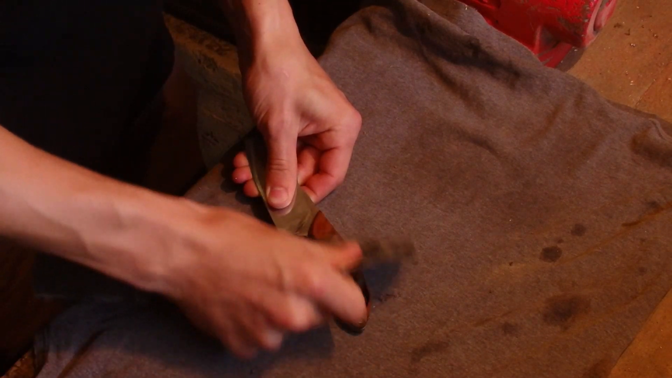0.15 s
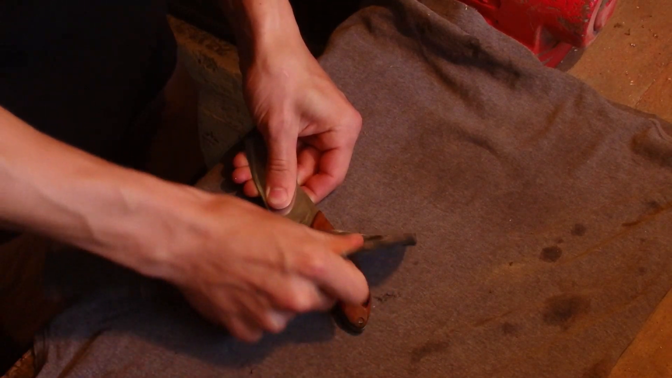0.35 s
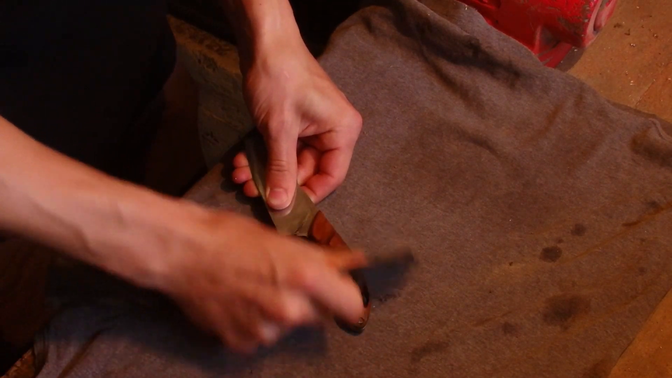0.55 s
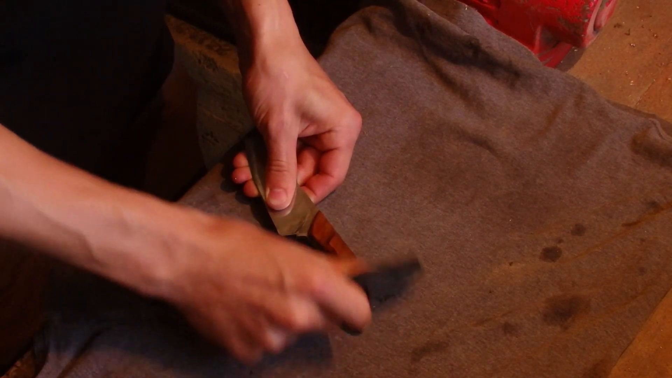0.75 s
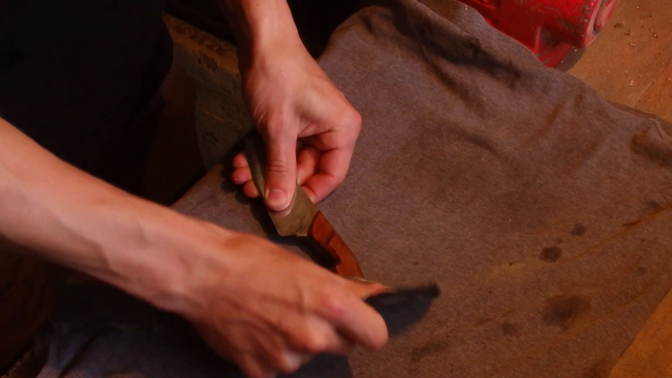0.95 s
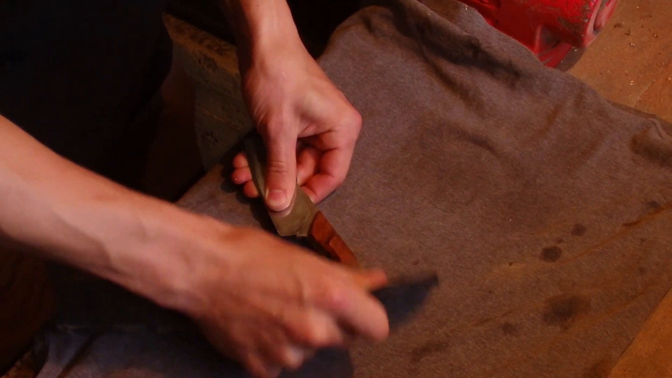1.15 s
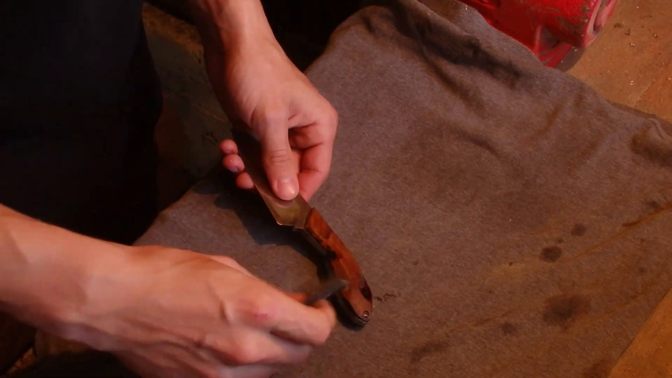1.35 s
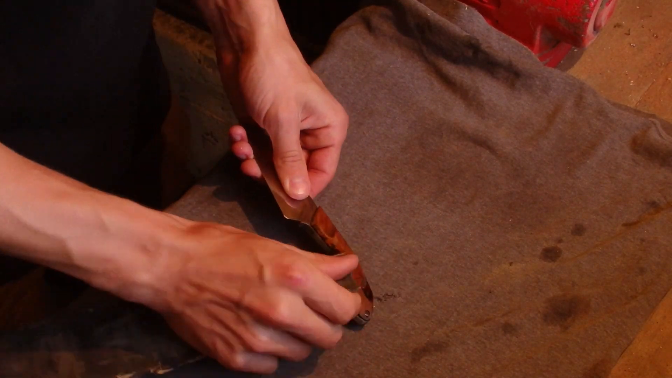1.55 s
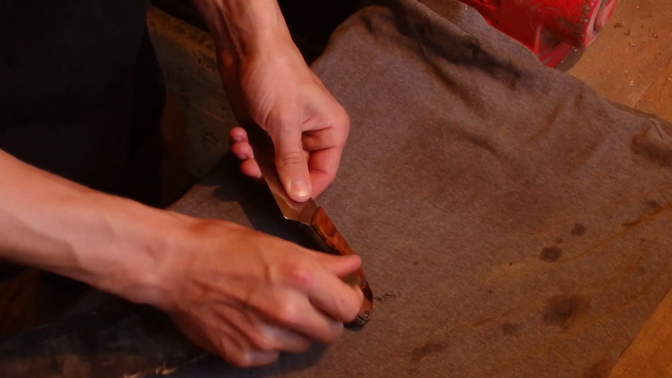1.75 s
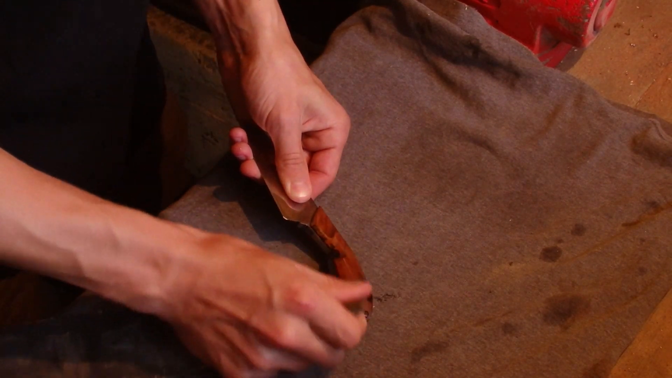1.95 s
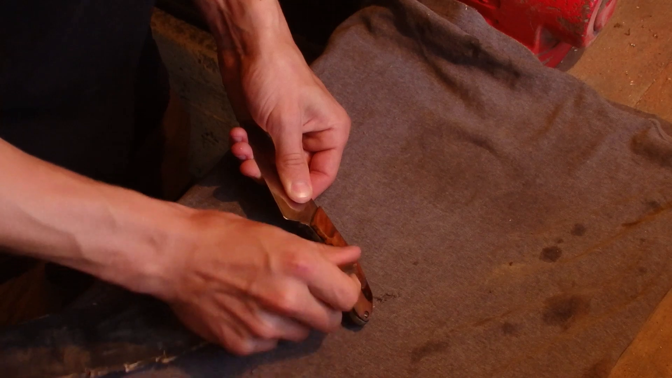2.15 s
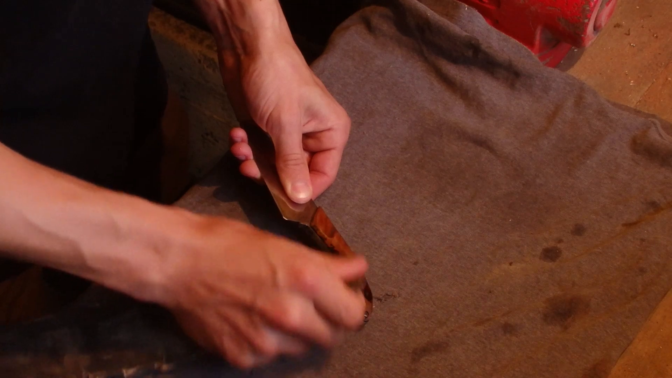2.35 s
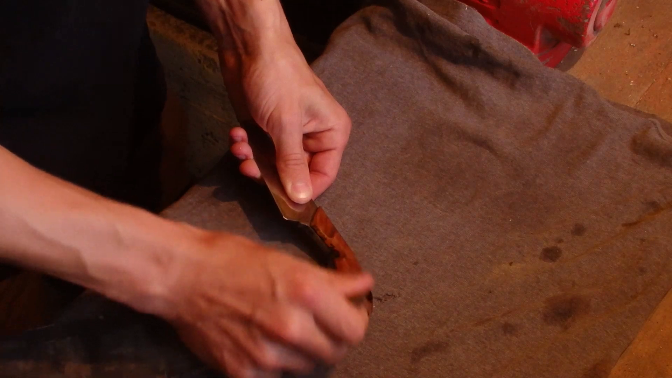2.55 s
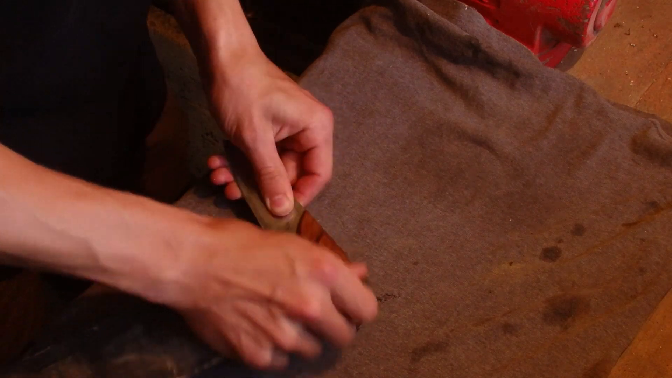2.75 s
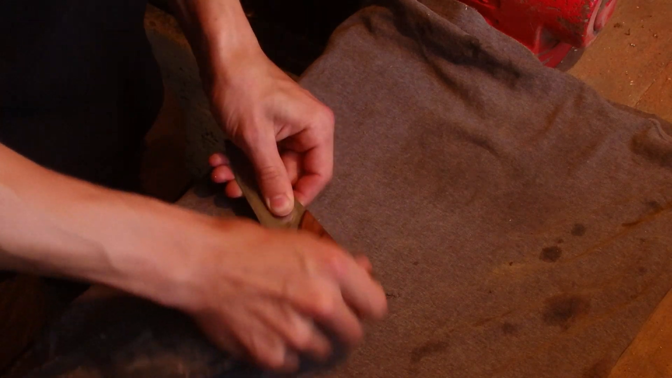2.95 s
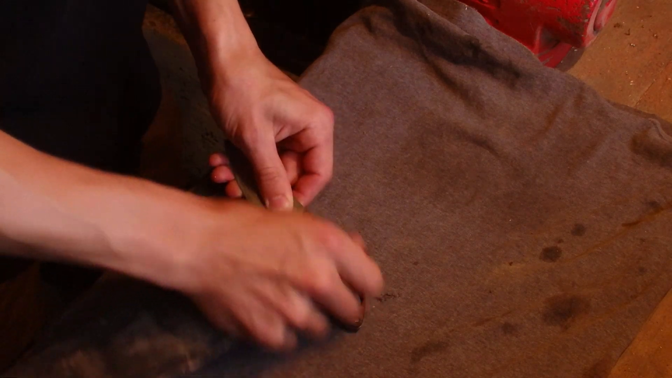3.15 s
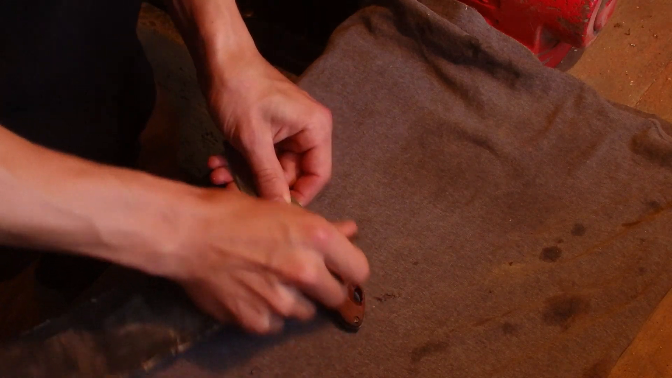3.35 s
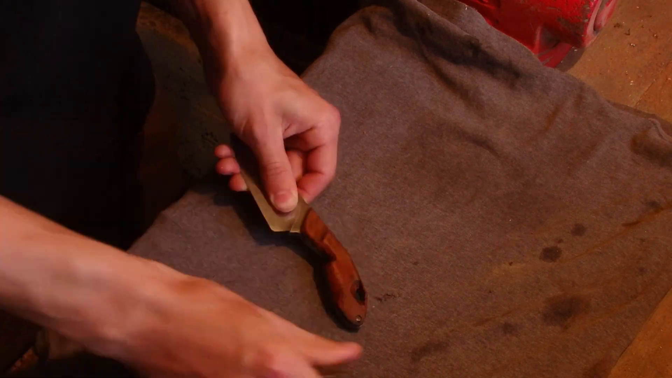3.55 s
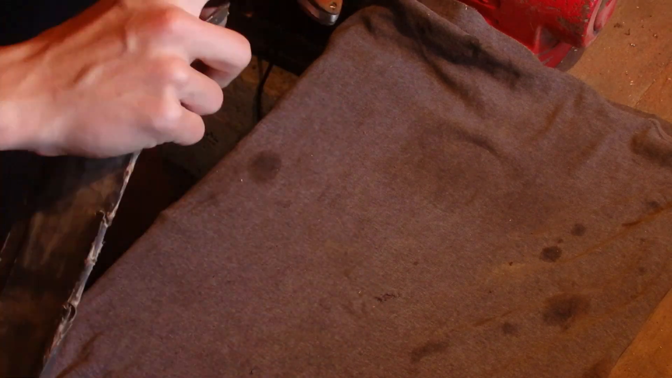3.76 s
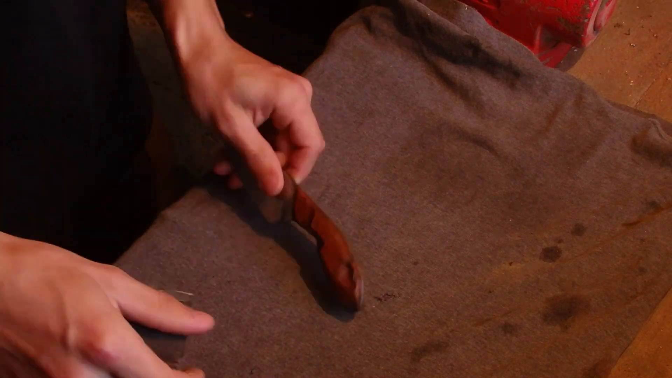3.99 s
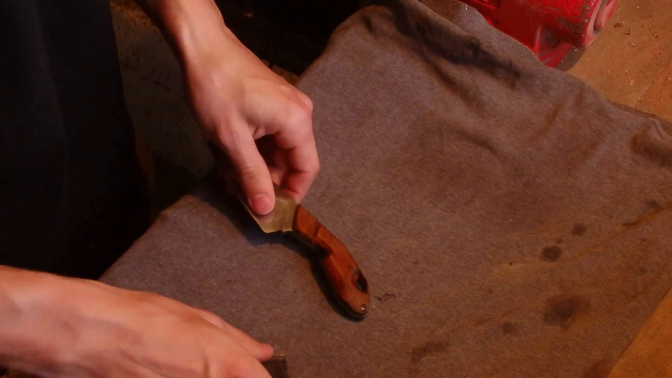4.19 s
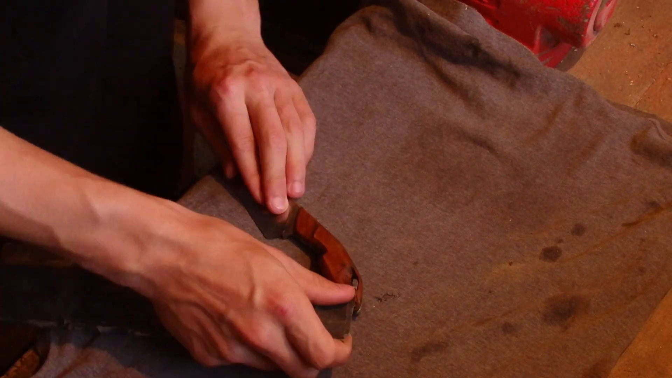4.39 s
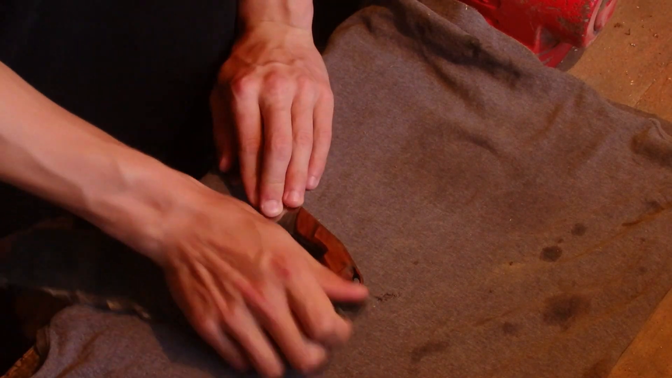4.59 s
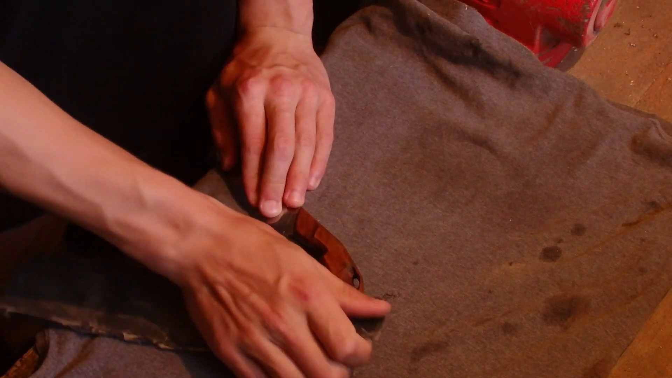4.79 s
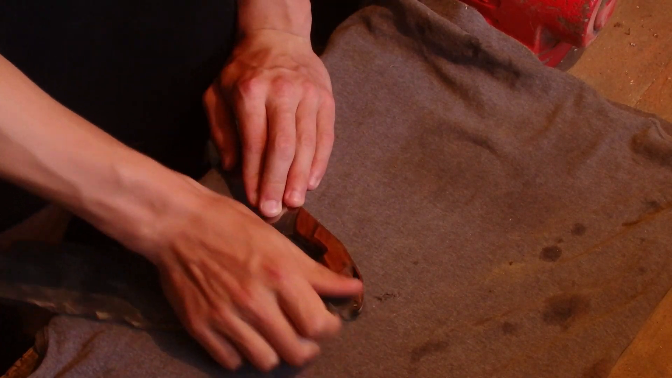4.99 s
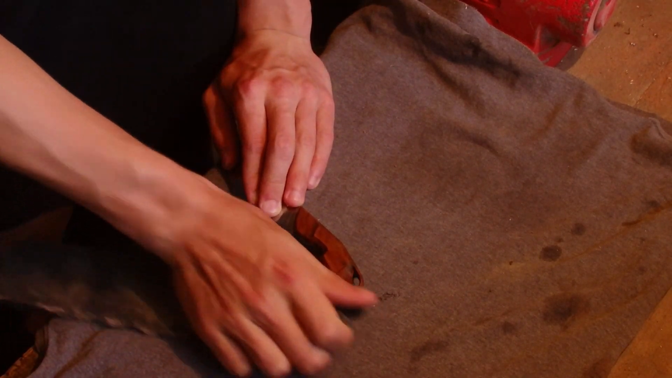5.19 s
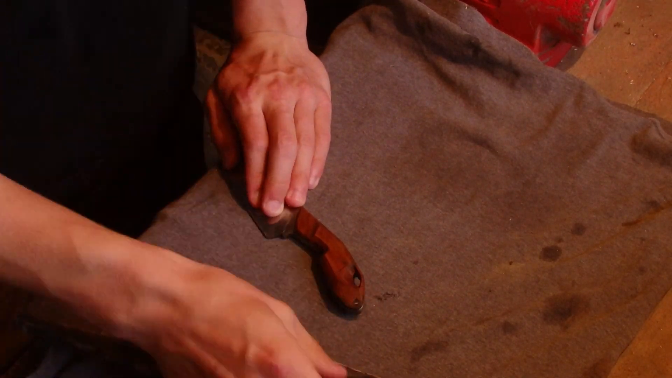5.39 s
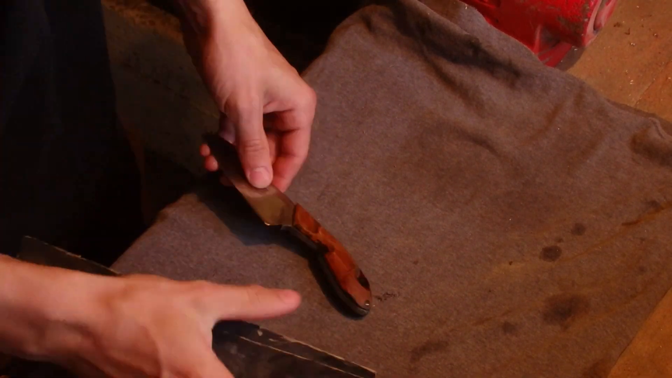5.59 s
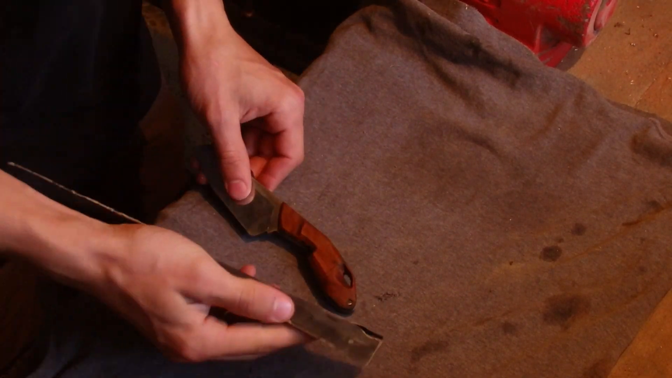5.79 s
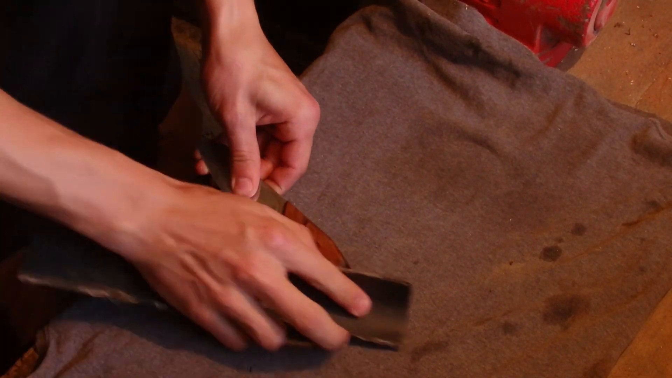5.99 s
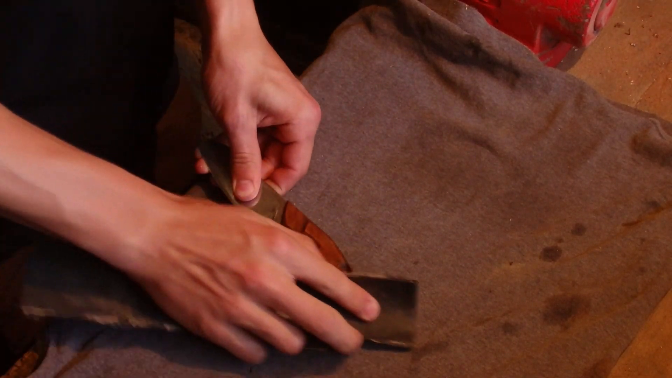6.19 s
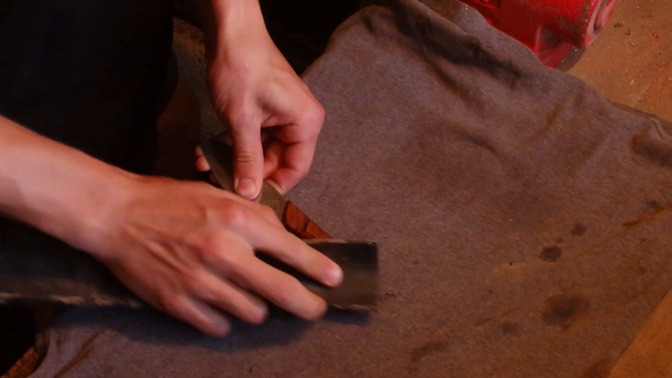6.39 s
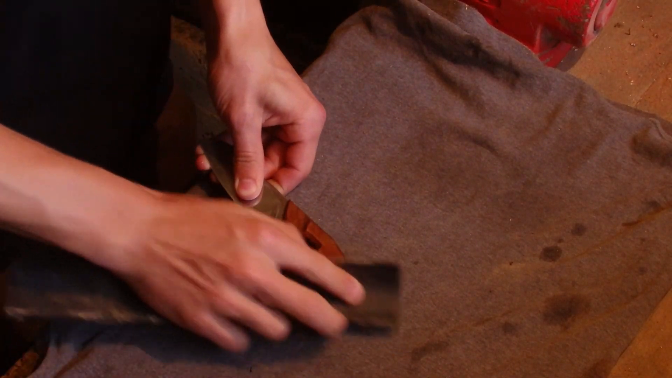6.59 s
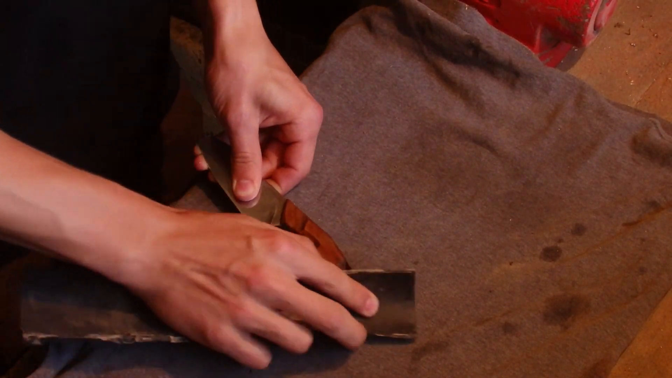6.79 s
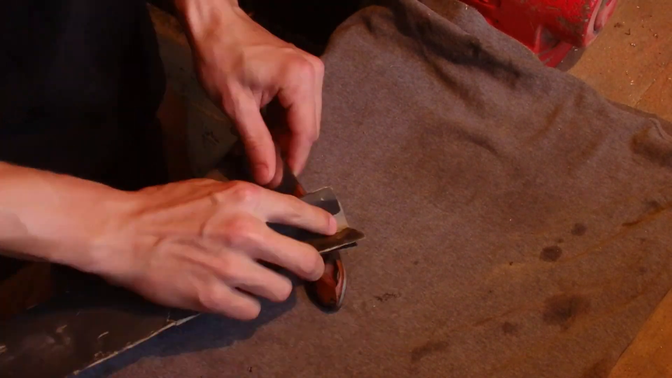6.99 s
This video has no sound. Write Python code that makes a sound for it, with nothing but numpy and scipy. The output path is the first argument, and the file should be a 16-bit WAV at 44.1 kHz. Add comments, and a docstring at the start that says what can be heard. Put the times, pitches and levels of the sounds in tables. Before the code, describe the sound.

Sandpaper rasps quickly back and forth on a steel blade in four runs, with paper rustles in the pauses and soft workbench thumps.

```python
"""A gritty rasp comes in four runs of short snatches, its level dipping briefly at each joint between them.
It is sandpaper on a steel blade: countless grain impacts make broadband noise, which the blade's modes
colour according to the grip. The cloth-covered bench rumbles and thumps under the hands, and the blade
knocks on it in the last run. Loose paper rustles in the pauses, and there are a few scuffs and squeaks.
All of it reaches one microphone with a few narrow notches in its response."""
import sys
import numpy as np
from scipy import signal
from scipy.fft import rfft, irfft, next_fast_len
from scipy.io import wavfile
from scipy.ndimage import uniform_filter1d, map_coordinates

SR = 44100
rng = np.random.default_rng(int(sys.argv[2]) if len(sys.argv) > 2 else 0)


def file_out(sig):
    """Save sig as 16-bit WAV at sys.argv[1]."""
    # one column per channel
    cols = np.atleast_2d(sig).T
    # limit, then scale
    lim = np.clip(cols, -1, 1)
    pcm = np.round(lim * 32767).astype(np.int16)
    wavfile.write(sys.argv[1], SR, pcm)


N = 310464

# successive holds on the work: (start [s], grip [0-4 firm rubbing, 5 loose handling])
GRIP_STAGES = [(0, 0), (.4, 0), (1.3, 5), (1.6, 1), (2.73, 2), (3.62, 5), (4.49, 3), (5.42, 5), (5.7, 5),
               (5.99, 4)]
# bench rumble in each stage: (deep mode [dB], upper modes [dB], cloth [dB])
RUMBLE_LEVELS = [(-51.5, -52.5, -55), (-52.5, -53, -50), (-56, -62, -57.5), (-55, -56.5, -60),
                 (-55.5, -57.5, -58.5), (-55.5, -60.5, -60), (-50, -49.5, -61), (-58, -54.5, -49.5),
                 (-57, -60.5, -56), (-47, -50, -79)]
# deep mode of the bench, which shifts with the load, for grips 0-5: (frequency [Hz])
DEEP_MODE_HZ = [67, 62, 68, 80, 78.8, 83.3]
# upper modes of the bench: (frequency [Hz], bandwidth [Hz], relative level [dB])
BENCH_MODES = [(196.8, 45, 6.5), (253, 39, -4.5), (309, 100, -13)]
# noise of the cloth: (frequency [Hz], relative spectral density [dB])
CLOTH_SPECTRUM = [(120, -1), (280, -2), (430, -3), (700, -6.5), (1500, -14.5), (16000, -38)]
# hands bumping the bench: (time [s], deep mode [dB], upper modes [dB])
HAND_BUMPS = [(.008, -36.5, -46), (0.046, -37, -38.5), (.085, -33.5, -41.5), (0.126, -42, -48),
              (0.171, -40, -44), (.205, -37, -53), (0.244, -42, -46), (0.282, -38, -43), (1.541, -47, -43),
              (1.587, -43, -41), (1.633, -44, -43.5), (1.696, -65, -39), (1.748, -45, -42),
              (1.844, -43, -39), (4.066, -52, -49), (4.326, -36.5, -42), (4.596, -38.5, -41),
              (5.54, -50, -45), (5.605, -50, -48), (6.059, -50, -41), (6.215, -43, -44), (6.285, -37, -40),
              (6.352, -36.5, -48), (6.456, -44, -55), (6.494, -54, -42.5), (6.565, -37, -50),
              (6.668, -43.5, -49), (6.814, -40, -47), (6.916, -39, -47), (6.956, -49, -42)]
# paper squeaks: (centre time [s], level [dB], duration [s], relative pitch glide [1/s])
PAPER_SQUEAKS = [(.11, -60, .04, 5), (.322, -58, .035, 4), (3.984, -55.5, 0.032, -2.5),
                 (4.032, -59.5, 0.033, 2.5), (4.476, -58, 0.023, 6)]
# partials of a squeak: (frequency [Hz], relative level [dB])
SQUEAK_PARTIALS = [(1135, 6.5), (2745, -7), (3876, -5)]
# scuffs on the bench: (centre time [s], level [dB], duration [s], frequency [Hz], bandwidth [Hz])
BENCH_SCUFFS = [(1.55, -43, 0.086, 2340, 910), (3.717, -33, 0.067, 1550, 2010),
                (5.718, -42, .03, 4200, 2500), (5.763, -43, 0.034, 10000, 6000),
                (5.775, -40.5, .045, 4500, 2500), (5.794, -38.5, 0.028, 9500, 6000),
                (5.808, -41, 0.044, 4270, 2500), (5.866, -32.5, 0.019, 3340, 500),
                (5.927, -39.5, 0.018, 2940, 910), (5.953, -40, 0.011, 2700, 1200),
                (6.237, -31.5, 0.032, 1740, 900), (6.269, -38, 0.032, 910, 400),
                (6.491, -31, 0.024, 1290, 700)]
# the blade knocking the bench: (time [s], level [dB])
BLADE_KNOCKS = [(6.127, -41.5), (6.23, -42), (6.264, -43), (6.363, -39), (6.407, -46), (6.617, -40.5),
                (6.824, -47), (6.859, -48), (6.905, -54), (6.964, -41)]
# light rubs of loose paper in the pauses: (start [s], duration [s], level [dB])
LIGHT_RUBS = [(1.276, 0.043, -38), (1.319, 0.042, -43), (1.36, .038, -46), (1.394, 0.046, -40),
              (1.435, 0.054, -44.5), (1.486, 0.05, -49.5), (1.573, 0.05, -46.5), (3.612, 0.036, -51),
              (3.668, 0.021, -63), (3.702, 0.039, -43), (3.952, 0.025, -59), (4.107, .08, -65),
              (4.243, 0.087, -61.5), (4.358, 0.081, -63.5), (4.432, 0.067, -53), (5.403, 0.049, -47.5),
              (5.441, 0.038, -57), (5.51, 0.082, -54), (5.591, 0.044, -46.5), (5.625, 0.044, -50.5),
              (5.668, 0.043, -51), (5.705, 0.048, -49), (5.746, 0.054, -46), (5.784, 0.043, -41.5),
              (5.82, 0.053, -48), (5.865, 0.026, -39.5), (5.878, 0.027, -41.5), (5.904, 0.056, -49),
              (5.942, 0.059, -47)]
# the four runs of firm rubbing: (start [s])
RUN_ONSETS = [-.029, 1.601, 4.491, 5.987]
# successive snatches, one row a run: (duration [ticks of TICK_S])
SNATCH_TICKS = [
    [6, 3, 5, 3, 8, 3, 5, 3, 5, 3, 3, 2, 3, 5, 5, 5, 3, 3, 5, 3, 3, 2, 3, 5, 3, 5, 5, 3, 3, 2, 3, 5],
    [2, 2, 3, 2, 3, 3, 3, 3, 3, 3, 4, 3, 4, 3, 3, 3, 3, 3, 4, 3, 3, 3, 3, 3, 3, 2, 3, 3, 3, 3, 3, 3, 3, 3,
     5, 3, 3, 2, 3, 3, 2, 3, 3, 3, 5, 3, 5, 3, 3, 5, 5, 3, 3, 5, 5, 3, 3, 5, 2],
    [2, 2, 7, 4, 2, 2, 5, 2, 7, 7, 7, 7, 7, 2, 3, 2, 7, 5, 6],
    [5, 2, 5, 3, 2, 3, 3, 2, 3, 3, 2, 3, 2, 3, 2, 3, 2, 5, 5, 3, 2, 3, 3, 4, 3, 5, 5, 3, 7, 2],
]
# dip at the joints of each run: (base depth [dB])
JOINT_DIPS = [5.5, 5.4, 4, 4.7]
# rubbing level set by the pressure on the paper: (time [s], nominal level [dB])
PRESSURE_LEVELS = [(0, -33.5), (.3, -32.5), (.8, -33.5), (1.25, -33.5), (1.61, -39.5), (1.64, -34),
                   (1.68, -31.5), (1.8, -31.5), (1.95, -32), (2.2, -33), (2.5, -34.5), (3.05, -33),
                   (3.55, -32), (4.49, -42.5), (4.53, -35), (4.6, -34), (4.66, -36.5), (4.72, -33),
                   (4.8, -34.5), (5.05, -32), (5.2, -34), (5.4, -33), (5.99, -42), (6.05, -35.5),
                   (6.16, -36), (6.24, -33), (6.46, -35.5), (6.52, -36), (6.85, -37), (7.03, -37.5)]
# noise of the grit: (frequency [Hz], relative spectral density for each of grips 0-5 [dB])
GRIT_SPECTRA = [(400, -29, -26.5, -44, -10.5, -33, -32), (890, -12.5, -4.5, -3.5, -7.5, -2, 1.5),
                (1386, -11, -9.5, -13.5, -9, -6, 0), (2330, -5.5, -2, -4.5, -3.5, -0.5, 2),
                (4120, -2, 0.5, -3, 2, 3, 6), (6750, -4, 3, -3, -4.5, -1, 1.5),
                (9620, 1, -1, -3, -4, 0, 0.5), (11970, -8, -8, -10.5, -14.5, -7, -7.5),
                (15500, -14.5, -13, -15, -19, -9, -10.5)]
# modes of the blade: (frequency [Hz], bandwidth [Hz], gain over the grit for each of grips 0-4 [dB])
BLADE_MODES = [(616, 21, 10.5, 8.5, 15, 0.5, 17), (1466, 19, 8.5, 6, 12.5, 8.5, 7),
               (1750, 85, 5, 7, 6.5, 7.5, 2.5), (1950, 90, -0.5, -11, -1, -2, -5),
               (2042, 44, -6, -2.5, -11, 12, 4), (2230, 150, 0.5, 6.5, -0.5, 1.5, 1.5),
               (2400, 45, 7, 9, 11.5, 5, 6.6), (2680, 23, 5.5, -4, 5, -6, 9.5),
               (3170, 38, 0.5, 6, 6, 3, -7), (3387, 147, 5.5, 10, 8, 4, 8.5),
               (4075, 120, 3, 9, 4.5, 2.5, 1), (4240, 100, 1, 7.5, 4, 5.5, 4),
               (4446, 106, 3.5, 7.5, 3.5, 3.5, 5.5), (5240, 110, 6.5, 7, 4, 3.5, 4),
               (6060, 190, 3.5, 5, 2, 6.3, 5), (7620, 160, 3, 6.5, 6.5, 1, -2),
               (8600, 160, 3.5, 5.5, 2, 4.5, 2.6), (9530, 350, -3.5, 0, -2.5, 2, 0.5)]
# the grit biting harder for a moment: (time [s], level relative to the steady rubbing [dB])
GRIT_CATCHES = [(.256, -2), (.337, -3), (.376, -10), (.909, -8), (.993, -9), (1.075, -7), (1.261, -11),
                (1.69, 1), (1.912, -1), (1.945, -5), (2.188, -5), (2.633, -4), (2.783, -4), (2.89, -3),
                (2.956, -2), (3.022, -3), (3.123, -6), (3.185, -4), (3.224, 3), (4.599, 1), (4.621, -4),
                (4.685, -2), (4.72, -4), (4.945, -2), (4.972, -2), (5.018, -18), (5.047, -2), (5.094, 1),
                (5.127, -1), (5.258, -3), (5.376, 0.5), (6.05, -6), (6.091, 1), (6.432, -2), (6.86, -1),
                (6.888, -8), (6.974, -3)]
# notches in the microphone's response: (frequency [Hz], bandwidth [Hz])
MIC_NOTCHES = [(2546, 47), (3596, 160), (4145, 137), (4651, 84), (12952, 420), (14987, 100)]

TICK_S = 512 / 48000  # every snatch lasts a whole number of ticks


def amp(db):
    """Amplitude ratio of a level in decibels."""
    return 10 ** (np.asarray(db) / 20)


def unit(x):
    """The signal scaled to unit RMS."""
    return x / np.sqrt(np.mean(x ** 2) + 1e-20)


def spectrum(knots_hz, knots_db, hz):
    """Amplitude at hz, with the levels interpolated over log frequency."""
    return amp(np.interp(np.log(hz + 1), np.log(knots_hz), knots_db))


def resonance(hz, centre_hz, width_hz):
    """Complex response of a damped oscillator, with gain 1 at its centre."""
    return 1j * hz * width_hz / (centre_hz ** 2 - hz ** 2 + 1j * hz * width_hz)


def filtered(x, response):
    """Linear filtering: the spectrum of x is multiplied by a frequency response."""
    size = next_fast_len(N + 8192)
    return irfft(rfft(x, size) * response(np.fft.rfftfreq(size, 1 / SR)), size)[..., :N]


def wobble(rate):
    """Smooth random modulation: a spline through `rate` Gaussian values a second."""
    return map_coordinates(rng.standard_normal(int(N * rate / SR) + 4), [np.arange(N) * rate / SR])


def stage():
    """The row of GRIP_STAGES that holds at each sample."""
    return np.searchsorted(np.transpose(GRIP_STAGES)[0] * SR, np.arange(N), side="right") - 1


def grip_weights():
    """Crossfade weights from 0 to 1, one curve for each grip."""
    grips = np.transpose(GRIP_STAGES)[1]
    return [uniform_filter1d(1. * (grips[stage()] == grip), size=800) for grip in np.unique(grips)]


def joints():
    """Boundaries of the snatches in seconds, run by run."""
    return [start + TICK_S * np.cumsum([0, *ticks]) for start, ticks in zip(RUN_ONSETS, SNATCH_TICKS)]


def bench_rumble(rubbing_db):
    """Forced vibration: the hands drive the bench's low modes at random, and its cloth adds noise."""
    levels = uniform_filter1d(np.transpose(RUMBLE_LEVELS)[:, stage()] * 1., size=3000)
    dips_db = rubbing_db - uniform_filter1d(rubbing_db, size=4000)
    shared_dips = amp(0.33 * dips_db)  # the bench follows a third of each dip
    carrier = np.exp(2j * np.pi * np.cumsum(np.dot(DEEP_MODE_HZ, grip_weights())) / SR)
    sway = lambda rate: wobble(rate) + 1j * wobble(rate)
    deep = np.real((0.42 + sway(35) + .5 * sway(110)) * carrier)  # a hum inside narrow and wide noise
    modes = lambda hz: sum(amp(db) * resonance(hz, centre, width) * resonance(hz, centre, 4 * width)
                           for centre, width, db in BENCH_MODES)
    upper = filtered(rng.standard_normal(N), modes) * amp(2.3 * wobble(14))
    cloth = filtered(rng.standard_normal(N), lambda hz: spectrum(*np.transpose(CLOTH_SPECTRUM), hz))
    cloth *= amp(2.5 * wobble(14))
    return sum(amp(db) * unit(shared_dips * layer) for db, layer in zip(levels, (deep, upper, cloth)))


def hand_bumps():
    """Free decay: after a soft push the damped bench modes ring for a few cycles."""
    out, t = np.zeros(N + SR), np.arange(SR // 8) / SR
    onset = 1 - np.exp(-t / 0.005)
    ring = lambda hz, t60_s: amp(11.5 - 60 * t / t60_s) * onset * np.sin(2 * np.pi * hz * t)
    upper = sum(amp(db) * ring(hz, t60_s=0.023) for hz, _, db in BENCH_MODES)
    deep = ring(np.mean(DEEP_MODE_HZ), t60_s=0.058)
    deep += amp(-5.5) * ring(hz=137, t60_s=0.041)  # a mode that only bumps excite
    for start, deep_db, upper_db in HAND_BUMPS:
        out[round(start * SR):][:len(t)] += amp(deep_db) * deep + amp(upper_db) * upper
    return out[:N]


def paper_squeaks():
    """Frequency modulation: a squeak's inharmonic partials glide and jitter together under one swell."""
    out, t = np.zeros(N + SR), np.arange(-SR // 16, SR // 16) / SR
    for centre, db, length, glide in PAPER_SQUEAKS:
        jitter = np.cumsum(rng.normal(0, 4e-6, len(t)))
        warped_time = t + .5 * glide * t ** 2 + jitter
        tones = sum(amp(level) * np.sin(2 * np.pi * hz * warped_time) for hz, level in SQUEAK_PARTIALS)
        swell = np.exp(-(2 * t / length) ** 4)
        out[round((centre + t[0]) * SR):][:len(t)] += amp(db) * tones * swell
    return out[:N]


def scuffs():
    """Sliding friction: paper or blade brushes the bench, giving a swell of band-limited noise."""
    out, t = np.zeros(N), np.arange(N) / SR
    for centre, db, length, centre_hz, width_hz in BENCH_SCUFFS:
        band = lambda hz: resonance(hz, centre_hz, width_hz) * resonance(hz, centre_hz, 2 * width_hz)
        noise = unit(filtered(rng.standard_normal(N), band))
        out += amp(db) * noise * np.exp(-(5.9 * (t - centre) / length) ** 2)
    return out


def blade_knocks(t60_s=0.054, rise_s=0.0071):
    """Impact excitation: a soft knock on the bench rings only the lowest mode of the blade."""
    out, t = np.zeros(N + SR), np.arange(SR // 8) / SR
    envelope = amp(9 - 60 * t / t60_s) * (1 - np.exp(-t / rise_s))
    ring = envelope * np.sin(2 * np.pi * BLADE_MODES[0][0] * t)
    for start, db in BLADE_KNOCKS:
        out[round(start * SR):][:len(t)] += amp(db) * ring
    return out[:N]


def rubbing_level(rustle_db=-62, fade_s=0.01, attack_s=0.014, release_s=0.026):
    """Amplitude envelope in dB: firm snatches and light rubs rise and fall above a faint rustle."""
    t = np.arange(N) / SR
    gain = np.full(N, amp(rustle_db))
    for edges, ticks, base_dip_db in zip(joints(), SNATCH_TICKS, JOINT_DIPS):
        lengths = np.diff(edges)
        scatter_db = rng.standard_normal((len(ticks), 2))
        hold_db = np.interp(edges[:-1] + lengths / 2, *np.transpose(PRESSURE_LEVELS))
        hold_db += .5 * scatter_db[:, 0]
        # long snatches are a little softer, and the joints between them dip deeper
        hold_db -= 0.24 * (ticks - np.mean(ticks))
        dip_db = base_dip_db + 1.15 * np.minimum(ticks[1:], ticks[:-1]) + scatter_db[1:, 1]
        joint_gain = np.r_[0, amp((hold_db[1:] + hold_db[:-1]) / 2 - dip_db)]
        fade = np.minimum(fade_s, lengths / 2)
        times = np.ravel([edges[:-1], edges[:-1] + fade, edges[1:] - fade], order="F")
        gains = np.ravel([joint_gain, amp(hold_db), amp(hold_db)], order="F")
        gain += np.interp(t, np.r_[times, edges[-1]], np.r_[gains, 0])
    for start, length, db in LIGHT_RUBS:
        rise, fall = min(attack_s, 0.27 * length), min(release_s, 0.76 * length)
        corners = start + np.array([0, rise, length - fall, length])
        gain += amp(db) * np.interp(t, corners, [0, 1, 1, 0])
    return 20 * np.log10(gain)


def grit_noise(drift_db=0.72, jump_db=1.1):
    """Superposed grain impacts: rough noise whose colour drifts at random and jumps at each joint."""
    _, t, frames = signal.stft(rng.standard_normal(N + 512), SR, nperseg=256)
    drift = uniform_filter1d(rng.standard_normal(frames.shape), size=6, axis=0)
    drift = uniform_filter1d(drift, size=9, axis=1)
    edges = np.concatenate(joints())
    snatch_colours = uniform_filter1d(rng.standard_normal((len(edges) + 1, len(frames))), size=2, axis=1)
    jumps = snatch_colours[np.searchsorted(edges, t)].T
    colour = amp(drift_db * unit(drift) + jump_db * unit(jumps))
    noise = signal.istft(frames * colour, nperseg=256)[1][:N]
    return noise * amp(0.65 * wobble(1500) + 0.42 * wobble(150) + 0.24 * wobble(50))


def sandpaper_on_blade(rubbing_db, catch_half_s=0.0045):
    """Source and resonator: grit noise drives the blade's modes, which each grip damps differently."""
    grit, blade = np.transpose(GRIT_SPECTRA), np.transpose(BLADE_MODES)
    mode_hz, width_hz = blade[:2, :, None]
    lift_db = np.array([*blade[2:], .5 * blade[2:].mean(axis=0)])  # loose handling rings the modes weakly

    def response(hz):
        """Grit spectrum times modal gain, one row a grip; the modes add in power."""
        broad = np.array([spectrum(grit[0], db, hz) for db in grit[1:]])
        modal_power = (amp(lift_db) ** 2 - 1) @ abs(resonance(hz, mode_hz, width_hz)) ** 2
        return broad * np.sqrt(np.maximum(1 + modal_power, .05))

    rasps = filtered(grit_noise(), response)
    steady = amp(rubbing_db) * sum(weight * unit(rasp) for weight, rasp in zip(grip_weights(), rasps))
    t = np.arange(N) / SR
    catches = sum(amp(db) * np.exp(-((t - centre) / catch_half_s) ** 2) for centre, db in GRIT_CATCHES)
    bite = filtered(steady, lambda hz: abs(resonance(hz, centre_hz=2260, width_hz=3800)))
    return steady + catches * bite


def scene():
    """Superposition: all sources add at one microphone, which feeds both channels."""
    rubbing_db = rubbing_level()
    mono = sandpaper_on_blade(rubbing_db) + bench_rumble(rubbing_db)
    mono += scuffs() + hand_bumps() + blade_knocks() + paper_squeaks()
    return np.array([mono, mono])


def record(dry):
    """Band-stop and low-pass filtering: narrow notches in the response, and nothing above the band limit."""
    depth, top_hz = .86, 15850  # depth: share of the amplitude removed at a notch's centre
    notches = lambda hz: [1 - depth * resonance(hz, centre, width) for centre, width in MIC_NOTCHES]
    return filtered(dry, lambda hz: np.prod(notches(hz), axis=0) * (hz < top_hz))


dry = scene()
out = record(dry)
file_out(out)
```